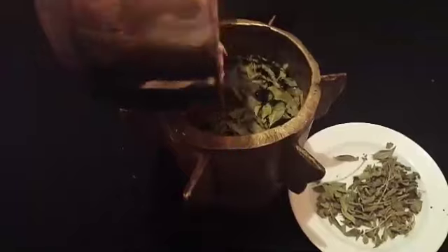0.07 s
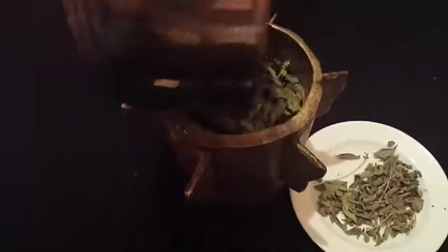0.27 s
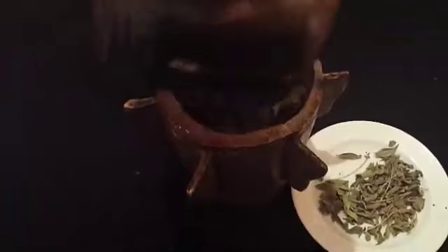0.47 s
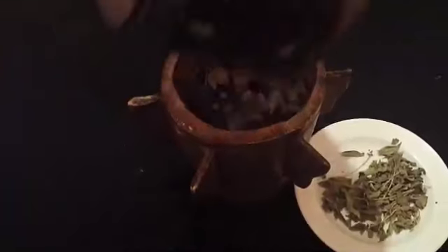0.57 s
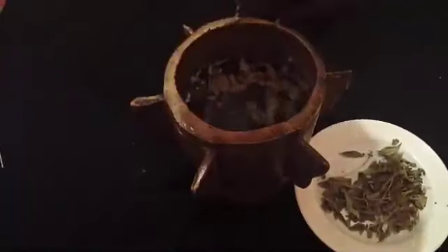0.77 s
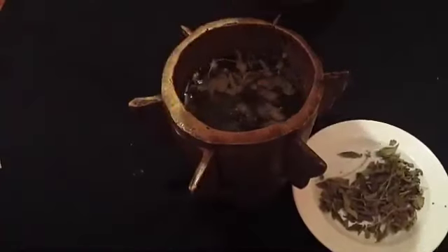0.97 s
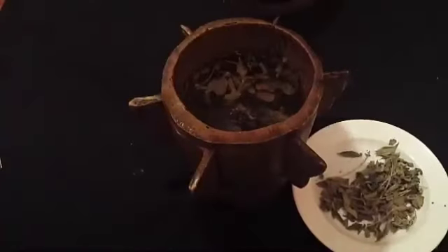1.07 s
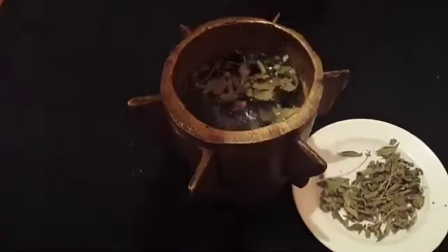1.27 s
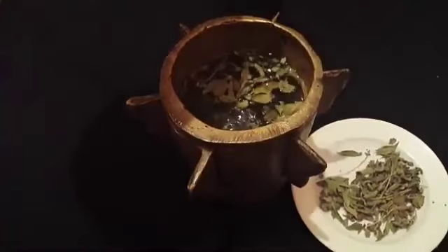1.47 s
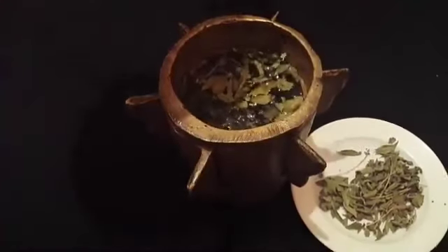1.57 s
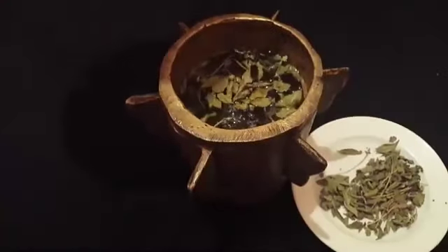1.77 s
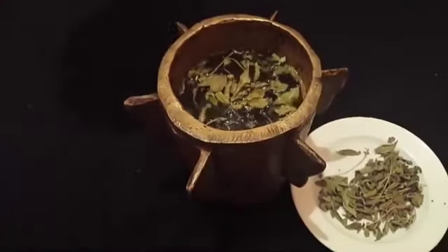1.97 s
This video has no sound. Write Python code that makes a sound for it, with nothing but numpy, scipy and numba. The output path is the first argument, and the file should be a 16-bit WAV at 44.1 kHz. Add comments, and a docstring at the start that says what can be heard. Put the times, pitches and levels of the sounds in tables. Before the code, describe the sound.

Molten metal sizzles in a small pot of water. After a dull knock on the pot, steam hisses and spits with brief squeaks over bubbling and low gulps, then dies to a few pops. Heard close up indoors.

```python
"""A dull knock on a small pot of water, then a burst of steam as molten lead is tipped in from a ladle.
Collapsing steam makes a dense sizzle with spits; the vapour film on the metal squeaks. Small bubbles
ring over low gulps and churning. As the lead sets the hiss dies, a thin steam whistle falls, and the
water settles with a few pops and ticks. Heard close up in a room, at a phone's two microphone ports."""
import sys
import numpy as np
from scipy import signal
from scipy.fft import rfft, irfft
from scipy.io import wavfile
from numba import njit

SR = 44100
rng = np.random.default_rng(int(sys.argv[2]) if len(sys.argv) > 2 else 0)


def bounce(signal):
    """Save signal as a 16-bit WAV file at the path given by the first command-line argument."""
    frames = np.transpose(np.atleast_2d(signal))
    limited = np.clip(frames, -1, 1)
    pcm = np.round(limited * 32767).astype(np.int16)
    wavfile.write(sys.argv[1], SR, pcm)


N = 88420
T = np.arange(N) / SR

# microphone self-noise spectrum (frequency [Hz], gain [dB])
FLOOR_EQ = [(25, -1.5), (300, -9), (1000, -20.5), (2800, -19.5), (4500, -14.5), (15000, -22.5)]
# room tail spectrum (frequency [Hz], gain [dB])
ROOM_EQ = [(300, -5), (1200, 1), (5000, -3), (14000, -4.5)]
# pot and table scatter spectrum (frequency [Hz], gain [dB])
SCATTER_EQ = [(300, -12), (1200, 6), (2200, -2), (4500, -0.5), (9000, -4)]
# modes of the knocked pot (frequency [Hz], level [dB], t60 [s])
KNOCK_MODES = [(109.8, -6.5, 0.13), (172, -10, 0.19), (261.6, -3, 0.19), (540, -1.5, 0.015),
               (787, -1, 0.019), (980, -32.5, 1), (1860, -22, 0.032), (2370, -30.5, 0.41)]
# deep churning envelope (time [s], level [dB])
CHURN_LEVEL = [(.21, -73), (.24, -40.5), (.33, -31.5), (.5, -40), (.87, -37.5), (1.2, -43), (1.44, -48),
               (1.5, -53), (1.66, -49.5), (1.72, -66.5), (1.9, -93)]
# churning spectrum (frequency [Hz], gain [dB])
CHURN_EQ = [(40, -42), (100, -23), (150, -11.5), (205, -6.5), (240, -11.5), (275, 4), (320, -6.5),
            (390, -13), (490, -30), (590, -10), (720, -28.5), (880, -19.5), (1300, -52.5)]
# large steam bubbles (time [s], pitch [Hz], level [dB])
GULP_EVENTS = [(0.231, 280, -32.5), (0.254, 134, -35.5), (.343, 285.5, -15), (0.358, 314, -16),
               (0.377, 374, -17.5), (.399, 271, -12), (.425, 272, -22), (0.826, 271, -17),
               (1.196, 264, -33), (1.609, 285, -28.5)]
# drops and popping bubbles (time [s], pitch [Hz], level [dB])
POP_EVENTS = [(1.267, 1170, -31), (1.309, 1380, -27.5), (1.344, 1150, -31.5), (1.484, 1393, -28.5),
              (1.536, 1030, -33.5), (1.628, 1030, -32.5), (1.665, 1060, -26.5)]
# last tiny bubbles on the metal (time [s], level [dB])
TICK_EVENTS = [(1.603, -36), (1.7364, -40), (1.7708, -45), (1.788, -43), (1.8064, -47), (1.8779, -52.5),
               (1.927, -50)]
# small-bubble envelope (time [s], level [dB])
BOIL_LEVEL = [(.16, -64.5), (.25, -30), (.35, -30.5), (.55, -34.5), (.605, -29), (.66, -36.5), (.71, -41.5),
              (.79, -37), (.94, -34), (1.01, -43), (1.12, -43), (1.2, -54.5), (1.66, -59), (1.75, -90)]
# pot response to small bubbles (frequency [Hz], gain [dB])
POT_EQ = [(350, -2), (490, -8.5), (590, -2), (720, -2), (1100, -5), (1280, 4), (1600, 10), (2000, 1),
          (2700, 9.5), (4500, 13.5)]
# resonance of the hollow where the lead enters (time [s], centre [Hz], band gain [dB])
HOLLOW_TRACK = [(.33, 1272, 4), (.55, 1245, -2.5), (.8, 1123, 7), (1.03, 1160, 1), (1.12, 1053, 17),
                (1.2, 1132, 12)]
# steam whistle of the setting metal (time [s], pitch [Hz], level [dB])
WHISTLE_TRACK = [(1.18, 5300, -57), (1.23, 5400, -50.5), (1.265, 4480, -47.5), (1.35, 4180, -52.5),
                 (1.39, 3250, -53.5), (1.43, 4060, -55.5), (1.53, 4040, -71)]
# vapour film squeaks (time [s], length [s], level [dB])
SQUEAK_EVENTS = [(.189, .007, -21.5), (.207, .01, -17), (.283, .005, -25), (.428, .02, -21),
                 (.548, .022, -22), (.591, .008, -18), (.61, .016, -23), (.644, .013, -19.5),
                 (.692, .003, -18), (.72, .013, -18), (1.077, .005, -27), (1.089, .003, -21),
                 (1.112, .025, -40)]
# steam spits (time [s], length [s], level [dB], centre [Hz])
SPIT_EVENTS = [(0.1446, 0.0041, -35, 8200), (0.208, 0.0071, -25, 6500), (0.28, 0.0072, -26, 8500),
               (0.598, 0.029, -25.5, 3230), (0.71, 0.0026, -25.5, 11600), (0.804, 0.0077, -23, 5500),
               (.953, 0.0055, -27, 8500), (1.076, 0.0012, -26, 8650), (1.085, 0.0016, -25.5, 8850),
               (1.089, 0.0016, -19.5, 5600), (1.881, 0.00026, -56, 5690)]
# sizzle envelope (time [s], level [dB])
SIZZLE_LEVEL = [(.135, -67), (.168, -53.5), (.19, -25), (.235, -26), (.255, -28), (.28, -26), (.325, -32.5),
                (.385, -23), (.45, -24), (.53, -23), (.575, -25), (.63, -24), (.69, -29.5), (.725, -28.5),
                (.755, -33.5), (.785, -29), (.83, -23), (.875, -29), (.94, -33), (1.02, -58), (1.2, -60),
                (1.55, -61.5), (1.72, -65), (2.0, -94)]
# sizzle spectrum (frequency [Hz], gain [dB])
SIZZLE_EQ = [(400, -26.5), (1900, -11.5), (2600, -5), (3400, -4), (4600, 3), (6400, 0.5), (7400, -2),
             (11000, -7), (14500, -9.5)]

LAG_SAMPLES, LAG_SPREAD_SAMPLES = 3.8, 1.2  # left port behind right
STEAM_CLICKS_PER_S = 12000
BUBBLE_RISE = 0.22  # relative pitch rise over one t60


def undb(db):
    """Decibels to gain."""
    return 10 ** (np.asarray(db) / 20)


def unit(x):
    """Scale to rms 1."""
    return x / np.sqrt(np.mean(x ** 2))


def curve(rows, column=1):
    """Table column, linearly interpolated in time."""
    rows = np.array(rows)
    return np.interp(T, rows[:, 0], rows[:, column])


def envelope(rows, column=1):
    """Gain from a dB column, zero outside its span."""
    return undb(curve(rows, column)) * (T > rows[0][0]) * (T < rows[-1][0])


def walk(rate_hz):
    """Smooth random signal, spread near 1."""
    return 1.2 * np.interp(T * rate_hz, np.arange(2000), rng.standard_normal(2000))


def colour(x, eq, size=4096):
    """Minimum-phase filter through (Hz, dB) points."""
    hz, db = np.array(eq).T
    bins_hz = np.arange(size // 2 + 1) * SR / size + 1
    gain = undb(np.interp(np.log(bins_hz), np.log(hz), db))
    cepstrum = irfft(np.log(gain))
    cepstrum[1:size // 2] *= 2
    cepstrum[size // 2 + 1:] = 0
    impulse = irfft(np.exp(rfft(cepstrum)))
    return signal.fftconvolve(x, impulse[None], axes=1)[:, :N]


@njit
def svf(x, hz, width_hz):
    """State-variable band-pass, gain 1 at its moving centre."""
    y, band_state, low_state = np.empty(len(x)), 0., 0.
    for i in range(len(x)):
        g, damping = np.tan(np.pi * min(hz[i] / SR, .45)), width_hz / hz[i]
        v = (band_state + g * (x[i] + 1e-18 - low_state)) / (1 + g * (g + damping))
        band_state, low_state = 2 * v - band_state, low_state + 2 * g * v
        y[i] = damping * v
    return y


def band(x, hz, width_hz):
    """Band-pass per channel."""
    return np.array([svf(channel, hz * np.ones(N), float(width_hz)) for channel in x])


def clicks(per_s, spread_db):
    """Random tiny collapses, each from its own place, so with its own left-port lag."""
    impulses = (rng.random(N) < per_s / SR) * rng.choice([-1, 1], N)
    right = impulses * undb(spread_db * rng.standard_normal(N).clip(-2.5, 2.5))
    lag = np.rint(LAG_SAMPLES + LAG_SPREAD_SAMPLES * rng.standard_normal(N)).astype(int)
    left = np.bincount((np.arange(N) + lag) % N, right, N)
    return unit(np.array([left, right]))


def burst(start_s, length_s, attack_s, release_s=.0016):
    """Linear attack, hold, exponential release."""
    attack = np.clip((T - start_s) / attack_s, 0, 1)
    return attack * np.exp(-np.maximum(T - start_s - length_s, 0) / release_s)


def add_ring(out, start_s, hz, db, t60_s, rise=0, swell_cycles=0.24):
    """Add a damped sine; its pitch changes by the fraction `rise` over t60."""
    first = int(start_s * SR)
    count = max(min(int(t60_s * SR), N - first), 0)
    t = np.maximum(np.arange(count) - np.array([[LAG_SAMPLES], [0]]), 0) / SR
    fade = np.exp(-np.log(1000) * t / t60_s) * (1 - np.exp(-hz * t / swell_cycles))
    phase = 2 * np.pi * hz * t * (1 + rise * t / t60_s / 2)
    out[:, first:first + count] += undb(db) * fade * np.sin(phase)


def floor(noise_db=-65, hum_hz=47.2, hum_db=-69.5):
    """Quiet microphone hiss and low hum."""
    noise = unit(colour(rng.standard_normal((2, N)), FLOOR_EQ))
    hum = np.sin(2 * np.pi * hum_hz * T) + undb(-7) * np.sin(2 * np.pi * 2 * hum_hz * T)
    return undb(noise_db) * noise + undb(hum_db) * unit(hum)


def reflections(x, eq, t60_s, gap_s, wet_db):
    """Direct sound plus a diffuse tail, different at each port."""
    tail = rng.standard_normal((2, N)) * np.exp(-np.log(1000) * T / t60_s) * (T > gap_s)
    tail = colour(unit(tail) / np.sqrt(N), eq)
    return x + undb(wet_db) * signal.fftconvolve(x, tail, axes=1)[:, :N]


def ports(x):
    """Left microphone port rings in the treble; right is slightly brighter."""
    left = undb(0.35) * x[:1] + undb(4.5) * band(x[:1], hz=4572, width_hz=720)
    right = x[1:] + undb(-10) * band(x[1:], hz=10700, width_hz=8500)
    return np.vstack([left, right])


def knock(level_db=-30.5):
    """Soft contact on the pot: each mode builds over about a cycle."""
    out = np.zeros((2, N))
    for hz, db, t60_s in KNOCK_MODES:
        add_ring(out, 0.056, hz, level_db + db, t60_s, swell_cycles=0.88)
    return out


def pot_ring(liquid):
    """Long ring of the pot, stirred by the water."""
    return undb(5.5) * band(liquid, hz=1021, width_hz=5.5)


def water(gulp_cycles=28.3, pop_cycles=6.2):
    """Deep churning, plus single ringing bubbles: gulps, pops, ticks."""
    out = unit(colour(clicks(per_s=240, spread_db=-3.5), CHURN_EQ)) * envelope(CHURN_LEVEL)
    for start_s, hz, db in GULP_EVENTS:
        add_ring(out, start_s, hz, db, gulp_cycles / hz, rise=-0.017, swell_cycles=1)
    for start_s, hz, db in POP_EVENTS:
        add_ring(out, start_s, hz, db, pop_cycles / hz, BUBBLE_RISE)
    for start_s, db in TICK_EVENTS:
        add_ring(out, start_s, hz=4200, db=db, t60_s=.006, swell_cycles=1.5)
    return out


def boil(per_s=2200, low_hz=480, high_hz=3800, ring_cycles=10.6, spread_db=1.9):
    """Swarm of small bubbles, each a short rising ring, coloured by the pot and the hollow."""
    calming_s = [.7, 1.4]  # after the pour: fewer, lower bubbles
    density = np.interp(T, calming_s, [1, .55])
    swarm, draws = np.zeros((2, N)), rng.random((8000, 4))
    for when, pitch, size, luck in draws[:int(per_s * N / SR)]:
        if luck < density[int(when * N)]:
            start_s = when * N / SR
            pitch_span = np.interp(start_s, calming_s, [1, .83])
            hz = low_hz * (high_hz / low_hz) ** (pitch * pitch_span)
            db = spread_db * min(-np.log(1 - size), np.pi)
            add_ring(swarm, start_s, hz, db, ring_cycles / hz, BUBBLE_RISE)
    swarm = colour(swarm / np.sqrt(density), POT_EQ)
    hollow = undb(curve(HOLLOW_TRACK, column=2)) * band(swarm, curve(HOLLOW_TRACK), width_hz=89)
    return unit(swarm + hollow) * envelope(BOIL_LEVEL)


def whistle(jet, wobble=0.078, flutter_hz=89.7, flutter_db=2):
    """Steam from the setting metal: a ragged, falling noise band."""
    hz = curve(WHISTLE_TRACK) * (1 + wobble * walk(flutter_hz))
    flutter = undb(flutter_db * walk(flutter_hz))
    tone = band(band(jet, hz, width_hz=770), hz, width_hz=590)
    return unit(tone * flutter) * envelope(WHISTLE_TRACK, column=2)


def squeaks(main_hz=4525, low_hz=4176, low_db=-8, wobble=.022, flutter_hz=380, flutter_db=3):
    """Vapour film vibrates in short bursts: two wavering tones that beat."""
    lag_samples = np.array([[3.53], [0]])
    film = 0
    for hz, db in (main_hz, 0), (low_hz, low_db):
        clock = np.cumsum(1 + wobble * walk(flutter_hz)) - lag_samples
        film = film + undb(db) * np.sin(2 * np.pi * hz * clock / SR)
    flutter = unit(undb(flutter_db * walk(flutter_hz)))
    gate = sum(burst(start_s, length_s, attack_s=.0039) * undb(db)
               for start_s, length_s, db in SQUEAK_EVENTS)
    return film * flutter * gate


def spits(jet, relative_width=0.88, snap_gain=0.9, snap_s=.00027):
    """Spits of steam: a snap, then a short broad hiss."""
    out = np.zeros((2, N))
    for start_s, length_s, db, hz in SPIT_EVENTS:
        hiss = unit(band(band(jet, hz, relative_width * hz), hz, relative_width * hz))
        snap = 1 + snap_gain * np.exp(-np.abs(T - start_s) / snap_s)
        out += undb(db) * hiss * snap * burst(start_s, length_s, attack_s=.00013)
    return out


def sizzle(sputter_hz=166.9, sputter_db=1.87, surge_hz=60, surge_db=1.3, sing_hz=4456):
    """Steam collapses in surging, dense clicks and sparser crackles; the vapour film sings softly."""
    flurries = unit(undb(sputter_db * walk(sputter_hz) + surge_db * walk(surge_hz)))
    hiss = unit(colour(clicks(STEAM_CLICKS_PER_S, spread_db=3) * flurries, SIZZLE_EQ))
    sing = undb(-2) * band(hiss, sing_hz * (1 + 0.024 * walk(surge_hz)), width_hz=200)
    crackle = undb(-14.5) * unit(colour(clicks(per_s=320, spread_db=0.5), SIZZLE_EQ))
    gain = undb(curve(SIZZLE_LEVEL)) * (T > SIZZLE_LEVEL[0][0])
    return (hiss + sing) * gain + crackle * gain ** 0.99  # crackle fades slightly slower


def scene():
    """Pot sources, scattered by pot and table, through the room and ports, over the noise floor."""
    liquid = boil() + water()
    hiss = sizzle()
    jet = clicks(STEAM_CLICKS_PER_S, spread_db=4)
    steam = hiss + spits(jet) + whistle(jet) + squeaks()
    pot = knock() + liquid + pot_ring(liquid) + steam
    near = reflections(pot, SCATTER_EQ, t60_s=.025, gap_s=.0005, wet_db=-6)
    room = reflections(near, ROOM_EQ, t60_s=.27, gap_s=.0095, wet_db=-8.5)
    return ports(room) + floor()


def record(dry, top_hz=14700):
    """Phone: soft clip, steep low-pass."""
    lowpass = signal.ellip(8, .2, 70, top_hz, fs=SR, output="sos")
    return signal.sosfilt(lowpass, np.tanh(dry))


dry = scene()
out = record(dry)
bounce(out)
```